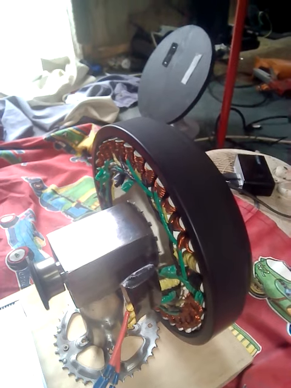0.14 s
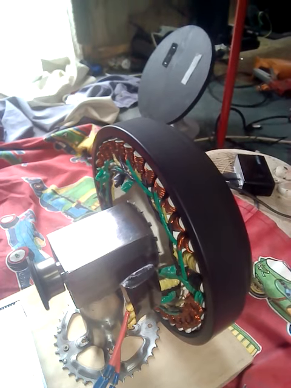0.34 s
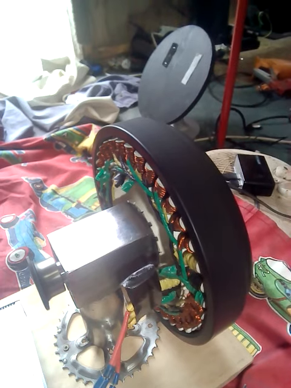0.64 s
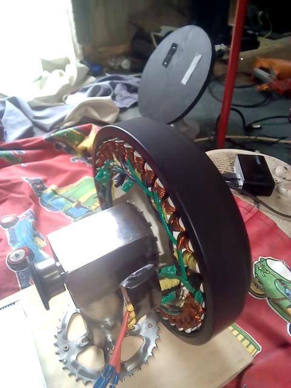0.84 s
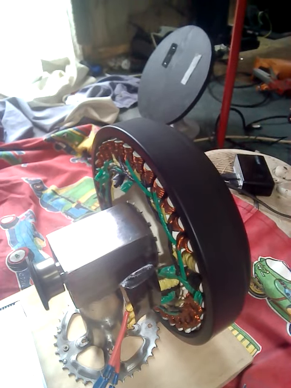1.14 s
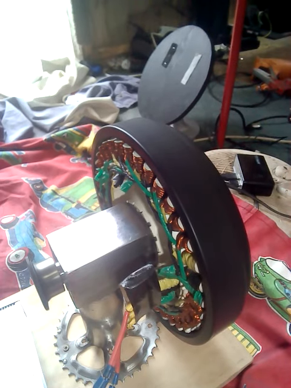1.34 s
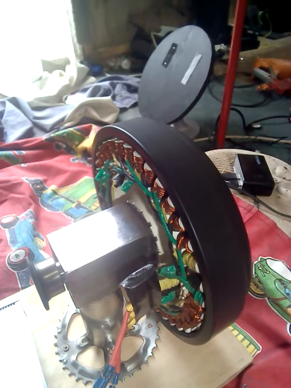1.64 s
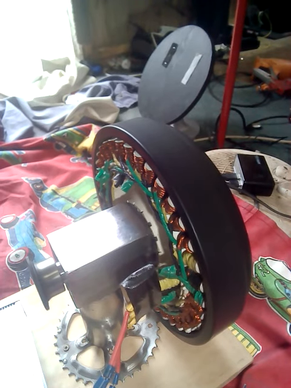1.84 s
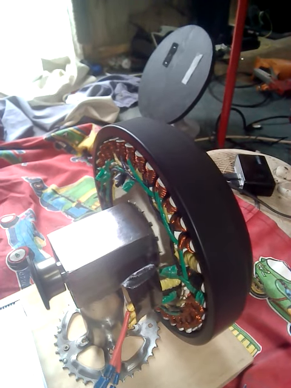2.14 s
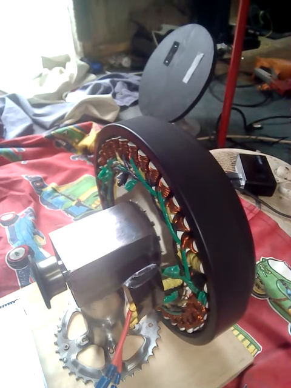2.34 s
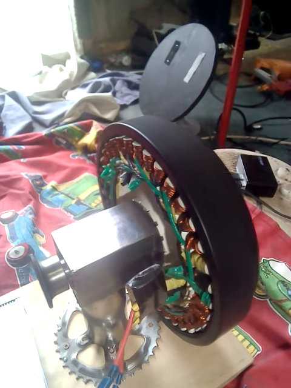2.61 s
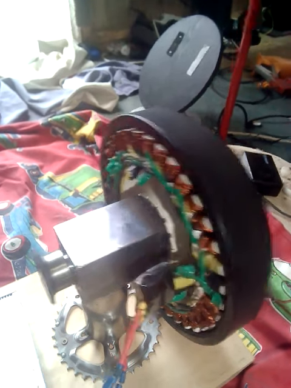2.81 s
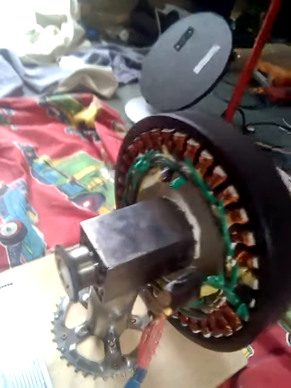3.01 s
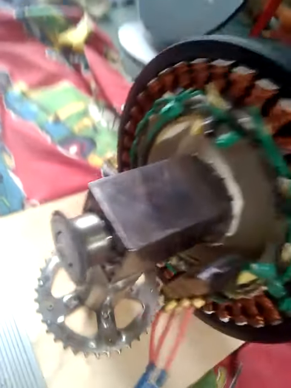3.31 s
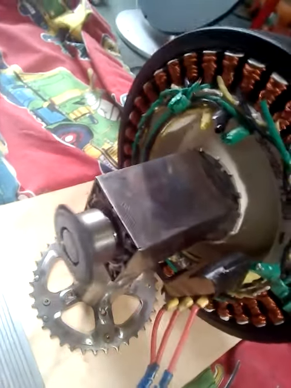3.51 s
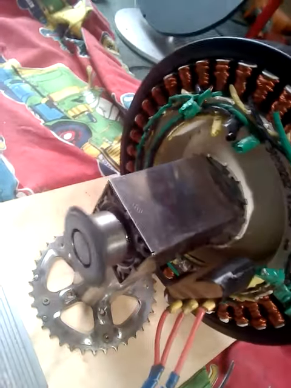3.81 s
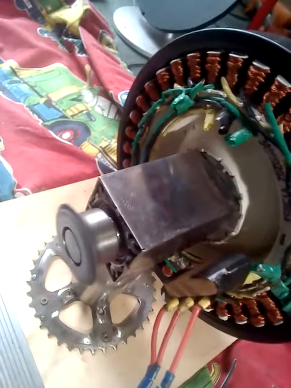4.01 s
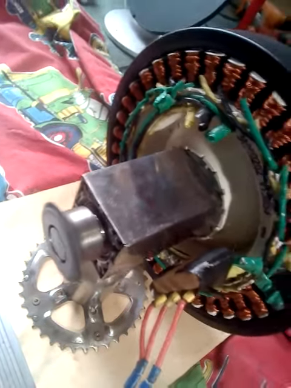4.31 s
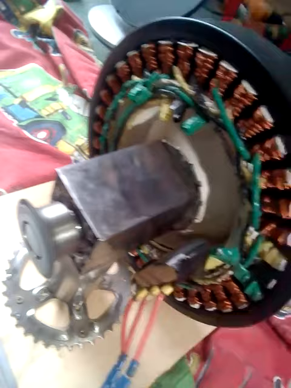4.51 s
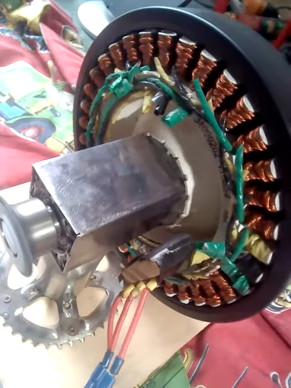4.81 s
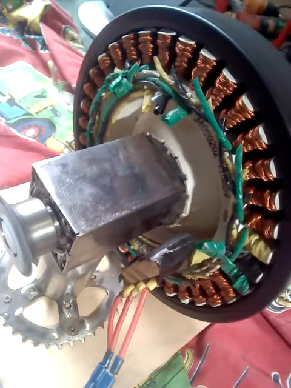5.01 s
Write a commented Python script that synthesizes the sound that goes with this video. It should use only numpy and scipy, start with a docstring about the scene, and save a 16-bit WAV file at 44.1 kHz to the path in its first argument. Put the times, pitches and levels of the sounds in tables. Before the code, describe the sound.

A hand-held phone close to a large open motor in a small room picks up a steady high whine with rapid beating, broad whirr and buffeting air. About halfway, power drops with a quick buzz and the rotor freewheels, quieter and lower. Plastic creaks and soft handling rustle follow. Finally a throbbing, raspy spin-up climbs within half a second back to the bright whine.

```python
"""On a workbench, a large bare outrunner motor whines at full speed close to a hand-held phone.
The drive cuts, the rotor coasts down, the phone creaks as it moves round, and the motor spins up again.
The whine is whole multiples of the shaft speed; sliding tones flare on the resonances of the shell.
Shaped noise makes the switching hash, the whirr, the rotor's draught on the microphone and the room;
short decaying sines make the creaks of the case."""
import sys
import numpy as np
from scipy import signal
from scipy.io import wavfile
from scipy.ndimage import uniform_filter1d

SR = 44100
rng = np.random.default_rng(int(sys.argv[2]) if len(sys.argv) > 2 else 0)


def unload_wav(signal):
    """Save mono or channel-first audio to the path in sys.argv[1] as 16-bit WAV at rate SR, clipped to [-1, 1]."""
    wavfile.write(
        sys.argv[1],
        SR,
        np.round(np.clip(np.atleast_2d(signal).T, -1, 1) * 32767).astype(np.int16),
    )


N = 227224

# Shaft: drive cut (s), full speed (turns/s), loss while the current dies (turns/s per s)
CUT_S, FULL_TURNS, BRAKE = 2.44, 26.5655, 14.4
# Free coasting: reference time (s) and speed there (turns/s), drag time (s), bearing friction as a speed
FREE_S, FREE_TURNS, DRAG_S, BEARING_TURNS = 2.5, 25.7, 4.004, 9.04
# Spin-up, an S-shaped pull capped at full speed: start (s), lowest speed and gain (turns/s), time (s), bend
START_S, LOW_TURNS, GAIN_TURNS, RAMP_S, RAMP_BEND = 4.137, 14.18, 14.215, .341, 1.66

# Magnetic tones at full speed: cycles_per_turn, side_level_db, facing_coils_level_db
STEADY_TONES = [(72, -52, -51), (73, -51, -46), (96, -49, -46), (106, -60, -48), (110, -77, -53),
                (120, -46, -44), (135, -53, -48), (140, -65, -51), (141, -47, -50), (142, -42, -55),
                (143, -48, -37), (144, -35, -33), (145, -32, -40), (146, -37, -35), (147, -54, -47),
                (148, -53, -41), (149, -56, -52), (152, -58, -53), (153, -54, -58), (154, -52, -48),
                (155, -63, -54), (168, -51, -45), (169, -55, -62), (172, -51, -49), (174, -53, -56),
                (176, -64, -55), (177, -58, -47), (178, -49, -47), (179, -51, -49), (181, -45, -54),
                (182, -38, -42), (183, -51, -58), (184, -52, -74), (186, -55, -58), (188, -48, -54),
                (189, -54, -63), (191, -45, -50), (192, -38, -41), (193, -55, -59), (202, -55, -55),
                (206, -55, -63), (215, -59, -56), (216, -53, -44), (226, -54, -55), (240, -53, -49),
                (264, -54, -61), (278, -68, -60), (288, -62, -54), (312, -69, -68), (336, -65, -70),
                (456, -82, -80), (480, -82, -95), (498, -87, -95)]
# Places of the phone: fade_in_s, full_s, fade_out_s, gone_s, rotor_angle_rad
HOLDS = [(-.2, -.1, 2.445, 2.462, 1.02), (4.63, 4.68, 6, 7, 2.35)]
# Phase lags between neighbouring tones, per place, for the families round 144 and 192 cycles per turn:
# shift_rad_per_order, stagger_rad, stagger_growth_rad
PHASE_LAGS = [
    [(.037, 1.13, -.211), (-.863, .499, -.8)],
    [(-.838, 1.258, .89), (-2.34, 1.34, -.42)],
]
# Strength traded between two tones before the cut: start_s, fullest_s
TRADE_S = (2.1, 2.44)
# Its extent when fullest: cycles_per_turn, change_db
TRADE_DB = {192: 8, 144: -4}

# Broad resonances of the rotor shell: frequency_hz, width_hz (doubled in each of two resonators), level_db
SHELL_MODES = [(2177, 130, -7), (3580, 1040, -4.5), (3780, 53, -20.5), (4330, 240, -8.5), (4920, 150, 2.5),
               (5186, 60, -2), (5820, 415, -3.5), (6560, 200, -2), (6470, 1270, -10.5), (8800, 99, -27)]
# Ragged switching current: time_s, level_db
SWITCHING_LEVEL = [(0, -46.5), (2.44, -46.5), (2.453, -34), (2.5, -35), (2.522, -41), (2.56, -58),
                   (4.06, -103), (4.09, -48), (4.22, -37), (4.62, -32), (4.68, -44), (5.2, -48)]
SWITCHING_TOP_HZ = 8700
# Shell modes that rasp: frequency_hz, width_hz (of each of two resonators), level_db
RASP_MODES = [(3485, 110, -39), (5235, 90, -41)]
CUT_RASP_DB = -1  # added to the upper rasp as the current dies

# Spectrum of the whirr: frequency_hz, density_db_per_hz
WHIRR_SPECTRUM = [(88, -25.5), (150, -1.5), (404, -0.5), (460, -2.5), (1350, 2), (3630, -14), (5810, -12.5),
                  (6730, -16), (7300, -53), (9490, -78.5), (16100, -120)]
# At full speed (dB), per doubling of speed (dB), added when facing the coils (dB)
WHIRR_DB, WHIRR_SLOPE_DB, FACING_DB = -37.5, 20.5, 2
TREBLE_HZ, TREBLE_SLOPE_DB = 3000, 16.5  # the treble dulls further per halving of speed
# Spectrum of the gusts on the microphone: frequency_hz, density_db_per_hz
GUST_SPECTRUM = [(8.8, -32), (15, 5.5), (65, 3), (139, -2.5), (190, -13), (244, -10), (292, -41.5),
                 (400, -28.5), (520, -58.5), (880, -120)]
# At full speed (dB), per doubling of speed (dB), added out of the draught (dB), lag of the air (s)
GUST_DB, GUST_SLOPE_DB, SHELTER_DB, SWIRL_S = -33.5, 36.5, -9.5, 0.052
COASTING_GUST_DB = -0.5  # added while the rotor coasts
SHELTER_HZ = 62  # out of the draught the deepest gusts no longer reach the microphone
# Spectrum of the quiet room: frequency_hz, density_db_per_hz
ROOM_SPECTRUM = [(24, -47), (40, -12), (300, 2), (674, -8.5), (1300, -4), (2250, -30.5), (2450, -36),
                 (4950, -61), (7500, -60), (9750, -83.5), (16500, -120)]
ROOM_DB = -52

# Slips of the grip on the phone's case: time_s, push_level_db, edge_brightness_db
SLIPS = [(2.3905, -33, -8), (2.9265, -35, 0), (2.9315, -34, -14), (2.935, -35, -16), (2.969, -39, -30),
         (2.985, -38, -30), (2.992, -35, -30), (3.4405, -37, -30), (3.4445, -30, -30), (3.4487, -29, -30),
         (3.4527, -27, -30), (3.4575, -25, -28), (3.4628, -26, -20), (3.4697, -24, -24), (3.4735, -35, -30),
         (3.4814, -19.5, -18)]
# Body modes of the case: frequency_hz, level_db, t60_s
CASE_BODY = [(280, 2, .014), (830, 12, .005)]
# Edge modes of the case: frequency_hz, level_db, t60_s
CASE_EDGE = [(2140, 2, 0.017), (2960, -0.5, 0.028), (4300, 3, 0.0088), (5900, 0, 0.0051)]
# The phone is carried round: start_s, full_s, slowing_s, still_s
MOVE = (2.92, 2.98, 3.7, 3.85)
MOVE_DB = -51  # rumble of the move, before the shelter thins it
RUSTLE_HZ, RUSTLE_WIDTH_HZ, RUSTLE_DB = 612, 120, -55.5  # the hand rubs the case

# Sharp modes crossed by sliding tones: frequency_hz, width_hz, gain_db, polarity
SHARP_MODES = [(870, 120, 5, 1), (1722, 91, -7, -1), (1879, 35, 2.6, -1), (2050, 261, 2.5, 1),
               (2167, 65, 6.3, 1), (2291, 48, 13.4, -1), (2385, 34, 0, -1), (2768, 202, -.4, 1),
               (3108, 40, -6, -1), (3349, 53, 6.5, -1), (3499, 52, 9, 1), (3652, 500, -2.4, 1),
               (4262, 208, 2.6, 1), (4893, 181, 4.3, 1), (5274, 338, 8.3, 1), (6229, 129, -2.9, 1)]
ROLL_OFF_HZ, MID_TURNS = 7000, 20  # treble limit of sliding tones; speed at which their dB is given
# Colour of sliding tones, heard from the side: frequency_hz, half_width_hz, change_db
SIDE_COLOUR = [(1520, 130, -12), (1850, 22, -9), (2054, 8, -10), (2360, 14, -8)]
# The same, facing the coils: frequency_hz, half_width_hz, change_db
FACING_COLOUR = [(2130, 55, -16), (2225, 40, 8), (2500, 200, 2.5), (3180, 50, -3), (3375, 20, 3),
                 (5300, 100, 2)]
# The same, for the faint coasting tones: frequency_hz, half_width_hz, change_db
COASTING_COLOUR = [(2250, 200, -16), (3090, 50, 17), (3480, 120, -10), (4250, 200, -5), (4900, 300, 4),
                   (6600, 300, 10)]
# Spans of the four sets of sliding tones, each: start_s, full_s, fade_s, gone_s
DYING = (2.443, 2.455, 2.505, 2.528)
FLARE = (2.445, 2.453, 2.46, 2.505)
COASTING = (2.48, 2.55, 4.03, 4.08)
LOADED = (4.08, 4.2, 4.64, 4.68)
# Tones as the current dies, by order: cycles_per_turn
DYING_ORDERS = (120, 144, 168, 216)
# Their strength before the shell: level_db, slope_db_per_doubling_of_speed
DYING_TONES = [(-44, 0), (-38, 0), (-50, 0), (-47, 0)]
# Flare at 192 cycles per turn: level_db, slope_db_per_doubling_of_speed
FLARE_TONE = [(-28.5, 0)]
# Coasting slot tone at 96 cycles per turn: level_db, slope_db_per_doubling_of_speed
SLOT_TONE = [(-49.9, 0)]
# Faint coasting tones, by order: cycles_per_turn
FAINT_ORDERS = (20, 48, 144, 192, 240, 288)
# Their strength before the shell: level_db, slope_db_per_doubling_of_speed
FAINT_TONES = [(-55.5, -3), (-57, 15), (-68, 1), (-70, 0), (-81, 3), (-73, 13)]
# Tones of the spin-up under load, by order: cycles_per_turn
LOAD_ORDERS = (72, 96, 120, 144, 168, 192, 216, 240, 288, 312, 336, 384)
# Their strength before the shell: level_db, slope_db_per_doubling_of_speed
LOAD_TONES = [(-54, 25), (-49.5, -13), (-54, 18), (-37.8, 27), (-54, 28), (-45.3, 16), (-49.5, 12),
              (-52.5, 2), (-42, 4), (-58, 0), (-46.5, 12), (-52, 0)]
# Throbs of the sliding tones under load: swells_per_turn, depth
THROBS = [(1, .25), (4, .3), (10, .2)]
# When all throbs are at their top, for the cut and the spin-up: cut_s, spin_up_s
THROB_TOP_S = (2.457, 4.49)

CHOP_HZ = 15260  # chopping rate of the controller
# Multiples of the shaft speed taken off the chopping rate: cycles_per_turn
CHOP_ORDERS = (384, 576, 432)
# Each counter tone: start_s, full_s, fade_s, gone_s, peak_level_db
CHOPS = [(2.45, 2.465, 2.49, 2.51, -33), (4.36, 4.38, 4.4, 4.415, -37), (4.41, 4.43, 4.48, 4.5, -37)]

EDGE_HZ = 13760  # upper band limit of the phone


def gain_of(db):
    """Decibel law: a level in dB becomes an amplitude ratio."""
    return 10 ** (np.asarray(db) / 20)


def evened(x):
    """Normalisation of power: scales to rms 1."""
    return x / np.sqrt(np.mean(x ** 2) + 1e-20)


def curve(rows, column):
    """Linear interpolation: one column of a table, whose first is time, at every sample."""
    rows = np.array(rows)
    return np.interp(np.arange(N) / SR, rows[:, 0], rows[:, column])


def swell(times):
    """Trapezoidal envelope: rises from 0 to 1, holds and falls back."""
    return np.interp(np.arange(N) / SR, times, [0, 1, 1, 0])


def slow(top_hz, low_hz=0.33):
    """Superposition of sines in random phase: a slow wander of rms 1."""
    t = np.arange(0, N + 256, 256) / SR
    wander = sum(np.sin(2 * np.pi * (f * t + rng.random())) / np.sqrt(f)
                 for f in np.geomspace(low_hz, top_hz, num=24))
    return np.interp(np.arange(N) / SR, t, evened(wander))


def noise(points, patchy_db, size):
    """Spectral shaping: random Fourier frames take a given spectrum with drifting patches."""
    hz = np.fft.rfftfreq(size, 1 / SR)
    f, db = np.transpose(points)
    real, imaginary, patches = rng.standard_normal((N * 4 // size + 5, len(hz), 3)).T
    patches = uniform_filter1d(patches, size=12, axis=0)  # smooth over frequency
    patches = evened(uniform_filter1d(patches, size=10, axis=1))  # and over time
    colour_db = np.interp(np.log(hz + 1), np.log(f + 1), db, left=-120, right=-120)
    frames = (real + 1j * imaginary) * gain_of(colour_db[:, None] + patchy_db * patches)
    return evened(signal.istft(frames, nperseg=size, noverlap=size * 3 // 4)[1][:N])


def ring(x, hz, width):
    """Damped resonance: a complex one-pole filter of about unit gain at its centre."""
    r = np.exp(-np.pi * width / SR)
    return 2 * signal.lfilter([1 - r], [1, -r * np.exp(2j * np.pi * hz / SR)], x).real


def rough_band(hz, width, db, flicker_db):
    """Resonant filtering of noise: two equal resonators leave a narrow, flickering band."""
    band = ring(ring(rng.standard_normal(N), hz, width), hz, width)
    return gain_of(db + flicker_db * slow(70., 6.5)) * evened(band)


def shaft():
    """Rotation under drive and drag: turns a second, and its integral, the rotor angle in radians."""
    t = np.arange(N) / SR
    braked = FULL_TURNS - BRAKE * (t - CUT_S)
    coasting = (FREE_TURNS + BEARING_TURNS) * np.exp(-(t - FREE_S) / DRAG_S) - BEARING_TURNS
    pull = (np.maximum(t - START_S, 0) / RAMP_S) ** RAMP_BEND
    pulled = LOW_TURNS + GAIN_TURNS * (1 - np.exp(-pull))
    speed = np.minimum(np.max([braked, coasting, pulled], axis=0), FULL_TURNS)
    return speed, 2 * np.pi * np.cumsum(speed) / SR


def whine(angle):
    """Beating of shaft harmonics: neighbouring tones beat once a turn, as the rotor is not quite round."""
    out = np.zeros(N)
    for place, (*times, start) in enumerate(HOLDS):
        drive = swell(times)
        on = drive > 0
        turned = (angle - place * angle[-1] + start)[on]  # the second hold is counted back from the end
        traded = (1 - place) * np.interp(np.arange(N)[on] / SR, TRADE_S, [0, 1]) ** 2  # first hold only
        for order, *db in STEADY_TONES:
            upper = int(order > 170)
            apart = order - (144, 192)[upper]
            shift, stagger, growth = PHASE_LAGS[place][upper]
            lag = shift * apart + stagger * apart ** 2 / 2 + growth * apart ** 3 / 6
            level_db = db[place] + TRADE_DB.get(order, 0) * traded + 0.78 * slow(4.1)[on]
            out[on] += drive[on] * gain_of(level_db) * np.sqrt(2) * np.cos(order * turned + lag)
    return out


def switching(angle):
    """Forced vibration: current noise bursts at each commutation, six per electrical cycle, shake the shell."""
    phase = angle * 144 / (2 * np.pi) % 1
    bursts = (.6 + np.exp(-phase / .3)) * rng.standard_normal(N)
    shell = np.zeros(N)
    for k, (hz, width, db) in enumerate(SHELL_MODES):
        mode = ring(ring(bursts, hz, 2.0 * width), hz, 2.0 * width)
        shell += (-1) ** k * gain_of(db) * mode  # alternate polarity
    shell = signal.sosfilt(signal.butter(8, SWITCHING_TOP_HZ, fs=SR, output="sos"), shell)
    return gain_of(curve(SWITCHING_LEVEL, 1) + 1.0 * slow(80.0)) * evened(shell)


def whirr(speed, moved):
    """Aerodynamic noise: a broad whirr whose level and brightness follow the speed."""
    octaves = np.log2(speed / FULL_TURNS)
    level_db = WHIRR_DB + WHIRR_SLOPE_DB * octaves + FACING_DB * moved
    broad = gain_of(level_db + 0.15 * slow(5.5)) * noise(WHIRR_SPECTRUM, patchy_db=1.0, size=1024)
    treble = signal.sosfiltfilt(signal.butter(2, TREBLE_HZ, "high", fs=SR, output="sos"), broad)
    return broad + (gain_of(TREBLE_SLOPE_DB * octaves) - 1) * treble


def buffet(speed, moved):
    """Turbulent pressure on the microphone: lumpy gusts follow the speed through the lag of the air."""
    keep = np.exp(-1 / (SWIRL_S * SR))
    swirl = 1 + signal.lfilter([1 - keep], [1, -keep], speed / FULL_TURNS - 1)
    level_db = GUST_DB + GUST_SLOPE_DB * np.log2(swirl) + SHELTER_DB * moved
    gusts = gain_of(level_db + COASTING_GUST_DB * swell(COASTING))
    rumble = gain_of(MOVE_DB) * swell(MOVE)
    lumps = evened(gain_of(4 * slow(40., 5.)) * noise(GUST_SPECTRUM, patchy_db=2.5, size=2048))
    thinned = signal.sosfilt(signal.butter(2, SHELTER_HZ, "high", fs=SR, output="sos"), lumps)
    return (gusts + rumble) * (lumps + moved * (thinned - lumps))


def quiet_room():
    """Stationary background noise: a soft, slightly patchy floor of sound."""
    return gain_of(ROOM_DB) * noise(ROOM_SPECTRUM, patchy_db=1.2, size=1024)


def creak():
    """Stick-slip friction: each slip is a short push that rings the plastic case."""
    t, out = np.arange(2000) / SR, np.zeros(N + 2000)
    push = 1 - np.exp(-(t / 0.0005) ** 2)  # soft start

    def struck(modes):
        """Modal decay: a sum of sines that die away exponentially."""
        return push * sum(gain_of(db - 60 * t / t60) * np.sin(2 * np.pi * hz * t) for hz, db, t60 in modes)

    body, edge = struck(CASE_BODY), struck(CASE_EDGE)
    for s, db, bright_db in SLIPS:
        out[round(s * SR):][:2000] -= gain_of(db) * (body + gain_of(bright_db) * edge)
    return out[:N]


def rasp(speed):
    """Resonance of the shell: noise in its modes rasps as the current dies and under load."""
    dying = swell(DYING) * gain_of(CUT_RASP_DB) * rough_band(*RASP_MODES[-1], flicker_db=2.5)
    under_load = sum(rough_band(*mode, flicker_db=2.5) for mode in RASP_MODES)
    return dying + swell(LOADED) * (speed / FULL_TURNS) ** 2 * under_load


def response(hz):
    """Modal superposition: complex gain of the shell for a tone at each frequency."""
    modes = sum(np.sign(side) * gain_of(db) / (1 + 2j * (hz - f) / width)
                for f, width, db, side in SHARP_MODES)
    return modes / (1 + (hz / ROLL_OFF_HZ) ** 8)


def glides(speed, angle, times, rows, order, rough_db, colour):
    """Swept resonance: slot tones slide with the speed and flare as they cross the shell's modes."""
    envelope = swell(times)
    tones, on = np.zeros(N), envelope > 0
    for n, (db, slope_db) in zip(order, rows):
        hz = n * speed[on]
        colour_db = sum(peak_db / (1 + ((hz - f) / half) ** 2) for f, half, peak_db in colour)
        speed_db = slope_db * np.log2(speed[on] / MID_TURNS)
        level = gain_of(db + colour_db + speed_db + rough_db * slow(85., 14.0)[on])
        tones[on] += level * (response(hz) * np.exp(1j * n * angle[on])).real
    tones = np.sqrt(2) * envelope * tones
    # the sharpest shell mode rings on and beats with the passing tone
    return tones + gain_of(-14) * ring(tones, 3400, 17)


def throb(angle):
    """Amplitude modulation: swells locked to the rotor, aligned once at the cut and once at the spin-up."""
    at_cut, at_spin_up = (angle[round(s * SR)] for s in THROB_TOP_S)
    since = angle - np.where(np.arange(N) / SR < MOVE[0], at_cut, at_spin_up)
    return 1 + sum(depth * np.cos(n * since) for n, depth in THROBS)


def sliding_tones(speed, angle):
    """Harmonics of a changing speed: throbbing tones under load, unthrobbed ones while coasting."""
    loaded = glides(speed, angle, DYING, DYING_TONES, order=DYING_ORDERS, rough_db=2.5, colour=SIDE_COLOUR)
    loaded += glides(speed, angle, FLARE, FLARE_TONE, order=(192,), rough_db=2, colour=SIDE_COLOUR)
    loaded += glides(speed, angle, LOADED, LOAD_TONES, order=LOAD_ORDERS, rough_db=1.5, colour=FACING_COLOUR)
    free = glides(speed, angle, COASTING, SLOT_TONE, order=(96,), rough_db=1.6, colour=SIDE_COLOUR)
    free += glides(speed, angle, COASTING, FAINT_TONES, order=FAINT_ORDERS, rough_db=4.5,
                   colour=COASTING_COLOUR)
    return loaded * throb(angle) + free


def counter_tones(angle):
    """Difference frequencies: chopping rate minus shaft multiples, which fall as the rotor speeds up."""
    t, out = np.arange(N) / SR, np.zeros(N)
    for n, (*times, db) in zip(CHOP_ORDERS, CHOPS):
        level = gain_of(db + 2.1 * slow(60., 7.8)) * swell(times)
        out += level * np.cos(2 * np.pi * CHOP_HZ * t - n * angle)
    return out


def rustle():
    """Rubbing friction: flickering band noise as the hand rubs the case while the phone moves."""
    return swell(MOVE) * rough_band(RUSTLE_HZ, RUSTLE_WIDTH_HZ, RUSTLE_DB, flicker_db=3.5)


def scene():
    """Linear superposition: motor, air, grip and the quiet room add at the microphone."""
    speed, angle = shaft()
    moved = np.interp(np.arange(N) / SR, MOVE[:2], [0, 1])  # 0 at the side, 1 facing the coils
    motor = whine(angle) + switching(angle) + rasp(speed) + sliding_tones(speed, angle) + counter_tones(angle)
    air = whirr(speed, moved) + buffet(speed, moved)
    grip = creak() + rustle()
    return (motor + air + grip + quiet_room())[None]


def record(dry):
    """Band limiting: a linear-phase low-pass stands for the upper limit of the phone."""
    low_pass = signal.firwin(511, EDGE_HZ, window=("kaiser", 9), fs=SR)
    return signal.oaconvolve(dry, low_pass[None], "same")


dry = scene()
out = record(dry)
unload_wav(out)
```